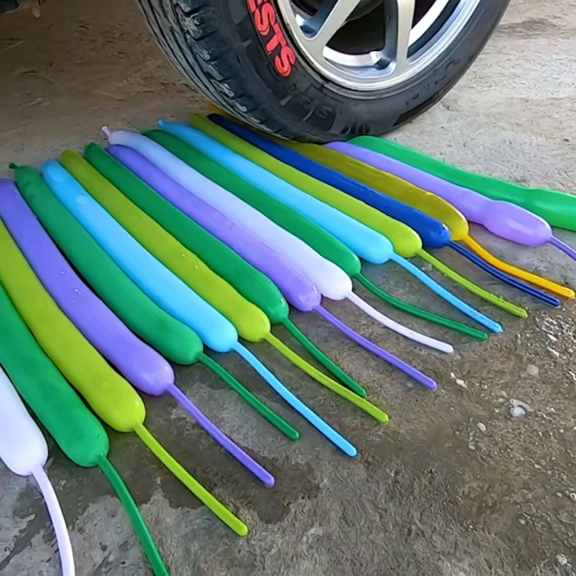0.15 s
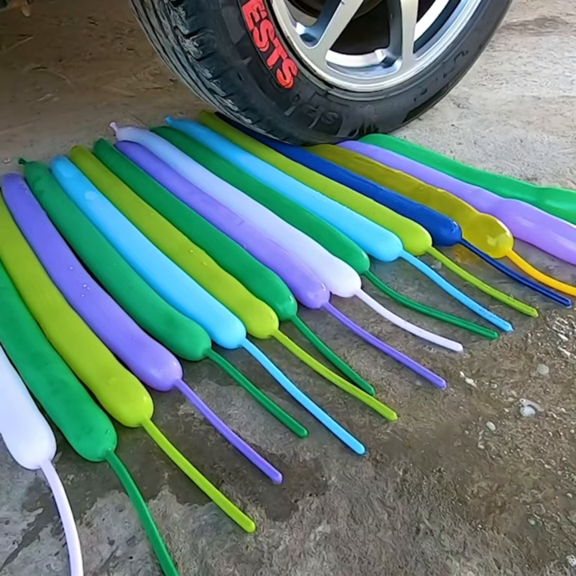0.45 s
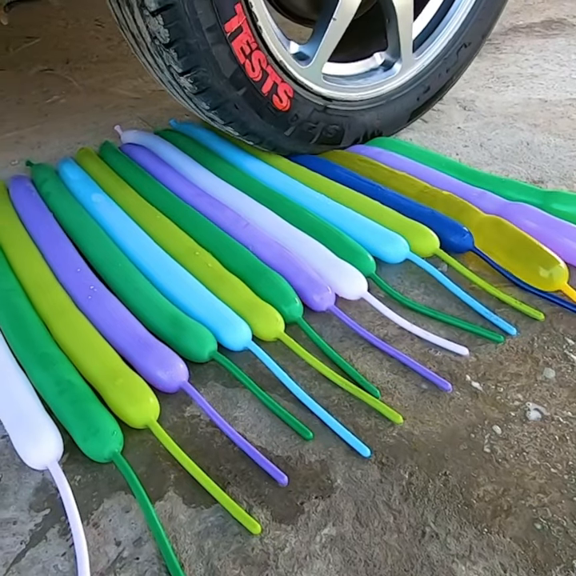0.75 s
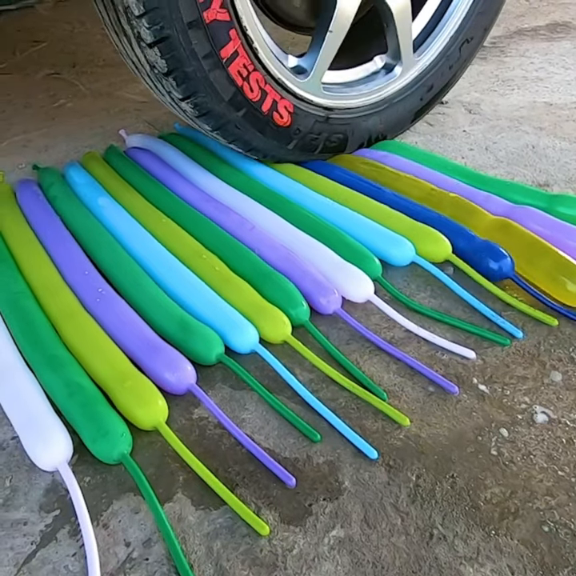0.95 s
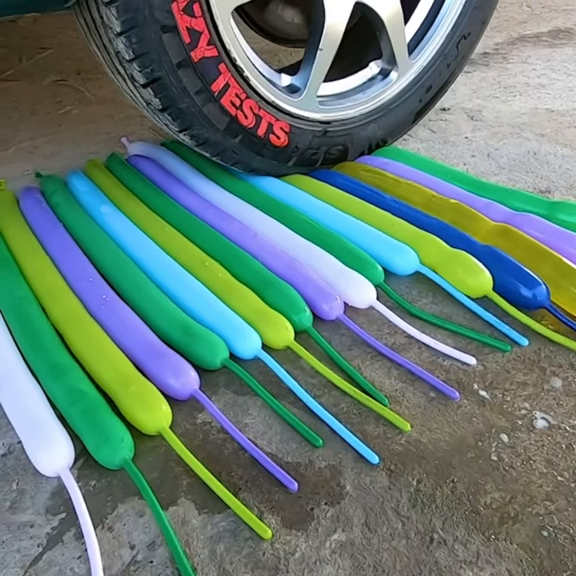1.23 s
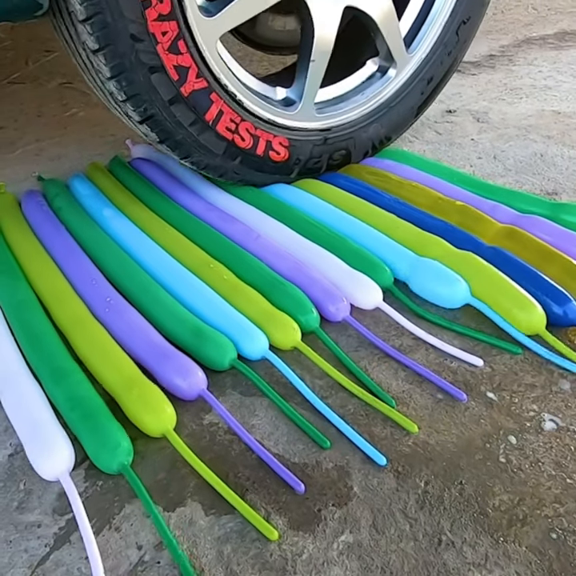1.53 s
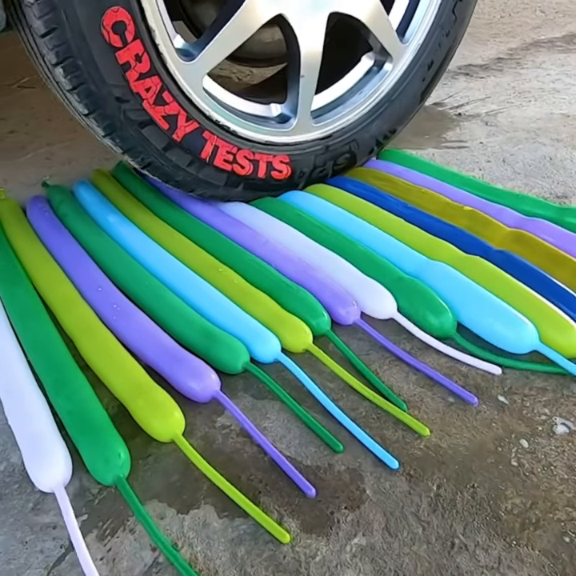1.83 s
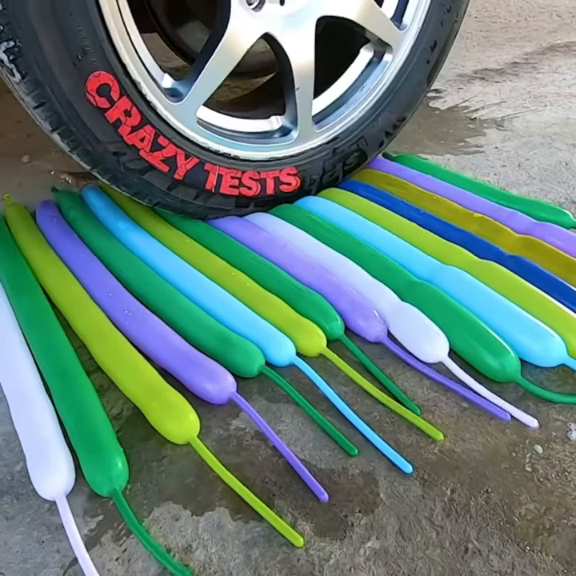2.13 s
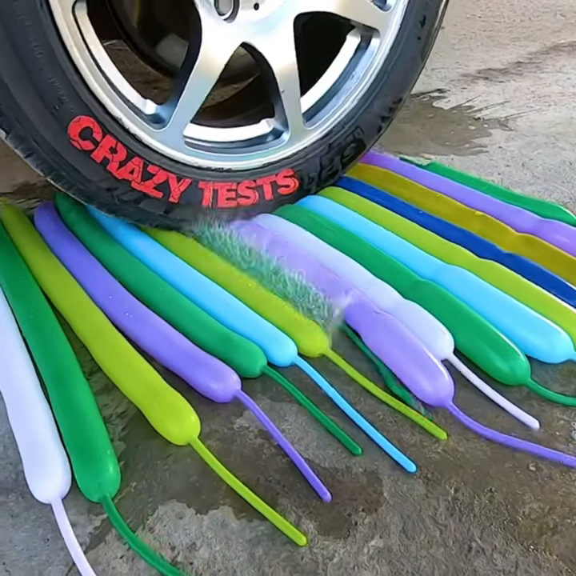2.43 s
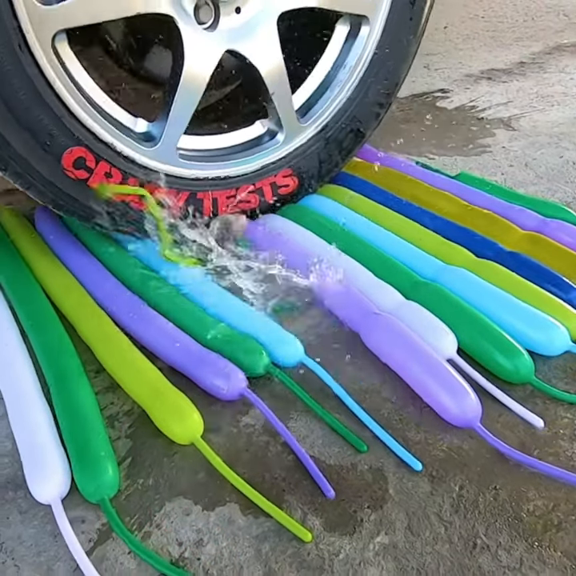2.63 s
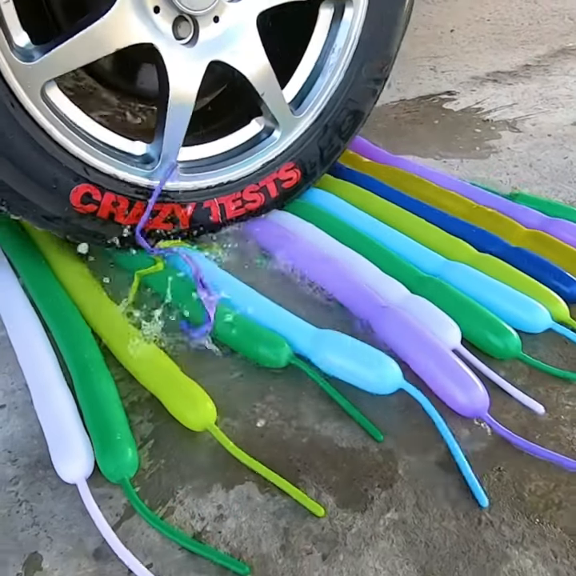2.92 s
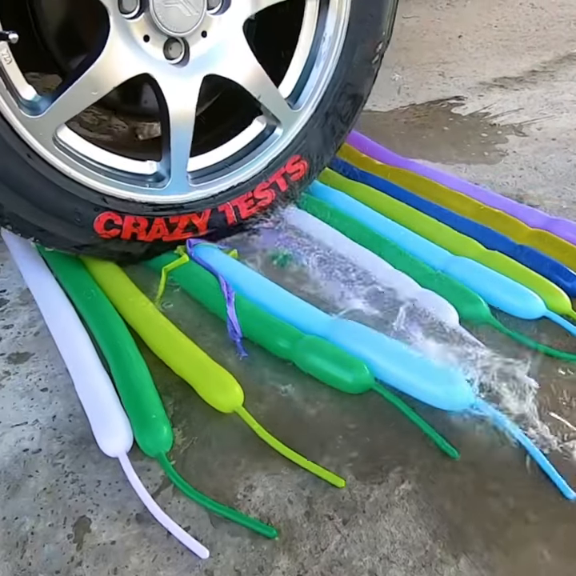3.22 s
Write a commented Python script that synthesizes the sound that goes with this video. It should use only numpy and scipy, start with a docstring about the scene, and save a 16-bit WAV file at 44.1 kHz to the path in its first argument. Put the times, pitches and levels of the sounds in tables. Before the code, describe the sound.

Water balloons bursting with sharp pops and splashes under a slow car tyre, engine rumbling.

```python
"""An engine throbs just above idle while a far bird chirps: a car is creeping over a row of long
water balloons on wet concrete. The first balloons tear under the tread with a squeak and a hissing
leak. Four more burst in the open: a crack of rubber, a sheet of spray, slaps of water with ringing
bubbles, then falling drops. The yard adds a short echo, and puffs of air rock the microphone."""
import sys
import numpy as np
from scipy import signal
from scipy.fft import rfft, irfft, next_fast_len
from scipy.io import wavfile
from scipy.ndimage import uniform_filter1d

SR = 44100
rng = np.random.default_rng(int(sys.argv[2]) if len(sys.argv) > 2 else 0)


def wav_record(signal):
    """Record a signal, one row per channel, as 16-bit PCM in the file named by sys.argv[1]."""
    frames = np.transpose(np.atleast_2d(signal))
    bounded = np.clip(frames, -1, 1)
    # unit amplitude maps onto the largest positive 16-bit level
    quanta = np.round(bounded * 32767).astype(np.int16)
    wavfile.write(sys.argv[1], SR, quanta)


N = 148617

# Tone of thrown spray, squirting water and the finest fizz. Each row: frequency in Hz, level in dB.
SPRAY_TONE = [(200, 0.5), (600, -1), (1400, -2), (3200, -2), (4600, -3), (6500, -10), (9500, -10),
              (12000, -20.5), (16000, -27)]
JET_TONE = [(200, 2.5), (700, -11.5), (1100, 1), (2200, -1.5), (3400, -0.5), (4600, -3), (5300, -9),
            (7000, -11), (11500, -19.5), (16000, -30)]
FIZZ_TONE = [(200, -53), (5000, -23), (7000, -6), (8300, 13), (10000, 1.5), (12000, -12.5), (13000, 2),
             (16000, -12)]


def undb(db):
    return 10 ** (np.asarray(db) / 20)


def unit(x):
    """Scale to rms 1."""
    return x / np.sqrt(np.mean(x ** 2) + 1e-20)


def colour(x, points):
    """Equalise along a curve of (Hz, dB) points."""
    hz, db = np.array(points, float).T
    size = next_fast_len(len(x))
    bins_hz = np.fft.rfftfreq(size, 1 / SR)
    gain = undb(np.interp(np.log(bins_hz + 1), np.log(hz), db))
    return irfft(rfft(x, size) * gain, size)[:len(x)]


def edge(x, hz, kind, order=2):
    """Low-pass or high-pass."""
    return signal.sosfilt(signal.butter(order, min(hz, SR / 2 - 100), kind, fs=SR, output="sos"), x)


def ring(x, hz, width):
    """A resonance applied twice; width is a share of its pitch."""
    b, a = signal.iirpeak(hz, 1 / width, fs=SR)
    return signal.lfilter(b, a, signal.lfilter(b, a, x))


def steady(x, size=260):
    """Even out the power of a noise over a window of size samples."""
    return x / np.sqrt(uniform_filter1d(x ** 2, size) + 1e-12)


def grains(size=32768, spread_db=4):
    """Noise whose level jumps every 32 samples: a spatter of water."""
    return rng.standard_normal(size) * undb(spread_db * np.repeat(rng.standard_normal(size // 32), 32))


def shape(x, rise, hold, t60):
    """Attack, hold and exponential release, all in seconds."""
    t = np.arange(len(x)) / SR
    return x * np.minimum(t / rise, 1) * np.exp(-np.log(1000) * np.maximum(t - rise - hold, 0) / t60)


def add(out, at, x):
    """Mix a sound in at a time in seconds."""
    i = int(at * SR)
    out[i:i + len(x)] += x[:max(N - i, 0)]


def air():
    """A faint high hiss fades at the start; puffs of air rock the microphone."""
    # Tone of the hiss. Each row: frequency in Hz, level in dB.
    hiss_tone = [(200, -14), (3000, -6), (8000, 4), (11000, -3), (13000, 8), (16000, -4)]
    # Sub-bass puffs. Each row: start in seconds, length in seconds, level in dB.
    puffs = [(2.675, 0.16, -29.5), (2.859, 0.13, -17), (3.283, 0.086, -19)]
    hiss = unit(colour(rng.standard_normal(N), hiss_tone))
    out = undb(-65.5) * shape(hiss, rise=0.0092, hold=0.032, t60=1.2)
    for at, length, db in puffs:
        swell = np.hanning(int(length * SR))
        buffet = edge(rng.standard_normal(N), 12.5, "low", order=3)[-len(swell):]
        add(out, at, undb(db) * swell * unit(buffet))
    return out


def bird():
    """A far bird: faint fluttering chirps that arch up in pitch and back."""
    # Each row: start in seconds, length in seconds, top pitch in Hz, level in dB.
    chirps = [(.71, .04, 4000, -65), (.745, .04, 3300, -65), (1.02, .04, 4500, -69),
              (1.065, .045, 4900, -67), (1.14, .04, 4400, -68), (1.44, .04, 4000, -71),
              (1.47, .03, 3700, -65)]
    out = np.zeros(N)
    for at, length, hz, db in chirps:
        arch = np.sin(np.linspace(0, np.pi, int(length * SR)))
        pitch = hz * (1 - .15 * (1 - arch))
        flutter = unit(edge(rng.standard_normal(N), 130, "low"))[:len(arch)]
        add(out, at, undb(db) * arch * flutter * np.sin(2 * np.pi * np.cumsum(pitch) / SR))
    return out


def engine():
    """A deep exhaust throb, wavering overtones, a faint whine and noise that swells with each firing."""
    # Engine speed. Each row: time in seconds, firings per second.
    firing_rate = [(0, 28), (.3, 27), (.7, 27.4), (1.1, 27.6), (1.5, 28.8), (1.9, 27.8), (2.15, 27.9),
                   (2.55, 23.6), (2.9, 26.6), (3.37, 25.9)]
    # Fader moves. Each row: time in seconds, throb level in dB, gain of the overtones in dB.
    faders = [(0, -28.5, -47), (.7, -26, -47), (1.6, -25, -46.5), (2.2, -25, -47.5), (2.45, -26, -51.5),
              (3.0, -27, -55), (3.37, -25.5, -52.5)]
    # Each row: multiple of the firing rate, relative level in dB.
    overtones = [(2, -9.5), (2.33, -31), (3, -10.5), (4, -18.5), (5, -3), (6, -4), (7, -17.5), (8, -22.5),
                 (10, -17), (12, -20.5)]
    # Tone of the engine and yard noise. Each row: frequency in Hz, level in dB.
    rumble_tone = [(20, 0), (60, 0), (150, -1), (230, -8), (400, -13), (680, -7.5), (900, -13.5),
                   (1350, -15), (2000, -22.5), (3200, -28.5), (5000, -31), (7000, -34), (11000, -47),
                   (16000, -46)]
    # Each row: pitch in Hz, width as a share of the pitch, level in dB.
    whines = [(1401, 0.07, -69), (5160, .05, -83.5)]

    def waver():
        return unit(edge(rng.standard_normal(N), 3, "low"))

    t = np.arange(N) / SR
    phase = 2 * np.pi * np.cumsum(np.interp(t, *np.array(firing_rate).T)) / SR
    when, throb_db, hum_db = np.array(faders).T
    throb = undb(np.interp(t, when, throb_db)) * np.sin(phase)
    hum = np.zeros(N)
    for multiple, db in overtones:
        level = undb(db + 1.23 * waver())
        hum += level * np.sin(multiple * phase + 0.45 * waver() + rng.uniform(0, 2 * np.pi))
    hum *= undb(np.interp(t, when, hum_db))
    rumble = unit(colour(rng.standard_normal(N), rumble_tone)) * (1 + 0.14 * np.sin(phase))
    whine = sum(undb(db) * unit(ring(rng.standard_normal(N), hz, width)) for hz, width, db in whines)
    return whine + np.sqrt(2) * (throb + hum) + undb(-50.5) * rumble


def jets():
    """Water hisses through a slit under the tread, which gives it a whistle; fine spray fizzes on top."""
    # Each row: start in seconds, level in dB, rise, hold and t60 in seconds, whistle pitch in Hz,
    # relative fizz in dB.
    squirts = [(1.684, -39.5, 0.0067, 0.0045, 0.27, 2680, -12.5),
               (1.819, -57.5, 0.031, .015, 0.2, 3630, -38), (1.952, -49.5, 0.0025, 0.015, 0.1, 2450, -8.5),
               (1.967, -47.5, 0.0094, 0.0059, 0.33, 3100, -24), (2.018, -58, 0.042, .07, 0.38, 3730, -7.5),
               (2.107, -54.5, 0.038, 0.028, 0.35, 3860, -6.5), (2.194, -59, 0.018, 0.011, 0.31, 3930, 3.5),
               (2.655, -50, 0.0016, 0.011, 0.084, 3500, 1), (2.701, -52, 0.031, .005, 0.27, 3330, -8),
               (2.883, -59, 0.014, 0.12, 0.77, 2900, -10.5), (3.099, -51.5, 0.072, 0.025, 0.24, 2890, -5.5),
               (3.154, -61, .002, 0.0024, 0.06, 2900, -25)]
    out = np.zeros(N)
    for at, db, rise, hold, t60, hz, fizz_db in squirts:
        flow = unit(colour(grains(), JET_TONE))
        whistle = undb(0.5) * unit(ring(grains(), hz, width=0.58))
        fizz = undb(fizz_db) * unit(colour(grains(), FIZZ_TONE))
        add(out, at, undb(db) * shape(flow + whistle + fizz, rise, hold, t60))
    return out


def squeaks():
    """Pinched rubber slips and tears: a narrow resonance with a rasp."""
    # Each row: start in seconds, level in dB, pitch in Hz, t60 in seconds, relative rasp in dB.
    slips = [(1.679, -31.5, 1183, 0.042, -10), (1.6775, -34.5, 2720, .055, -2.5),
             (1.690, -29, 4440, 0.049, -2), (1.692, -39.5, 1720, 0.11, 0), (2.15, -51.5, 2035, 0.21, -14),
             (2.7322, -24.5, 4270, 0.02, -11.5), (2.949, -41, 3570, 0.026, -15)]
    out = np.zeros(N)
    for at, db, hz, t60, rasp_db in slips:
        tone = steady(ring(grains(size=8192), hz, width=0.084))
        rasp = undb(rasp_db) * unit(colour(grains(size=8192), JET_TONE))
        add(out, at, undb(db) * shape(tone + rasp, rise=0.00033, hold=0.0014, t60=t60))
    return out


def bubble(hz, cycles, glide=0.078):
    """A pocket of air rings down by 40 dB over some cycles, rising a little in pitch."""
    age = np.arange(int(cycles / hz * SR)) * hz / SR / cycles  # 0 to 1
    return np.sin(2 * np.pi * cycles * age * (1 + glide * age / 2)) * np.exp(-np.log(100) * age)


def bubbles(count=200, per_s=420, low_hz=995, high_hz=5070):
    """Small bubbles of many sizes, one after another."""
    out = np.zeros(N)
    for k, (jitter, pitch, strength) in enumerate(rng.random((count, 3))):
        hz = low_hz * (high_hz / low_hz) ** pitch
        add(out, (k + jitter) / per_s, 2 * strength ** 2 * bubble(hz, cycles=20.4))
    return out[:SR]


def drops(per_s=250, spread_db=27, size=32768):
    """Falling drops land as scattered ticks of uneven strength."""
    # Tone of a drop. Each row: frequency in Hz, level in dB.
    drop_tone = [(300, 7), (1200, -19), (3500, 9.5), (6500, -13), (10000, -2), (12500, -12), (16000, -25)]
    hits = (rng.random(size) < per_s / SR) * undb(-spread_db * rng.random(size))
    return unit(colour(hits, drop_tone))


def slaps():
    """Slugs of water strike tyre and ground: a knock, then trapped air rings briefly under a splash."""
    # Each row: start in seconds, level in dB, cavity pitch in Hz, t60 in seconds, relative splash in dB.
    impacts = [(2.413, -36, 259, 0.32, -10), (2.434, -24, 1690, .045, 0.5), (2.431, -36.5, 466, 0.14, -19),
               (2.469, -33, 1490, 0.047, -16), (2.468, -41, 446, 0.2, -10), (2.4874, -28, 990, .025, -20),
               (2.5261, -22.5, 1200, 0.028, -3), (2.5335, -26, 1420, 0.068, 4.5),
               (2.529, -37, 397, 0.19, 2), (2.5555, -22.5, 1480, 0.044, -1.5),
               (2.562, -34, 1020, 0.11, 5.5), (2.580, -36.5, 3920, 0.048, -2),
               (2.799, -38.5, 1825, 0.11, 8.5), (2.837, -33.5, 1300, 0.077, -27),
               (2.840, -42.5, 580, 0.11, -18), (3.203, -26.5, 1520, 0.15, -24),
               (3.214, -18, 1133, 0.08, -8), (3.216, -22, 2333, 0.024, -2),
               (3.2305, -27.5, 760, 0.031, -14), (3.231, -23, 2510, 0.052, -2.5),
               (3.251, -29, 2340, 0.039, -4), (3.272, -41.5, 1030, 0.078, 1.5),
               (3.318, -47, 2560, 0.032, -21)]
    out = np.zeros(N)
    for at, db, hz, t60, splash_db in impacts:
        cavity = steady(ring(grains(size=8192), hz, width=0.37))
        splash = unit(edge(colour(grains(size=8192), SPRAY_TONE), 4550, "low", order=1))
        slap = shape(cavity + undb(splash_db) * splash, rise=0.00056, hold=0.0025, t60=t60)
        knock = undb(5) * bubble(hz, cycles=14.4)
        add(slap, 0, knock)
        add(out, at, undb(db) * edge(slap, hz * 0.53, "high", order=4))
    return out


def crack(fizz_db, size=2048):
    """A rip runs through the rubber in about a millisecond and flings off the finest spray."""
    # Tone of ripping rubber. Each row: frequency in Hz, level in dB.
    rip_tone = [(200, -1), (1000, -4.5), (2000, 3), (3600, 10.5), (5500, 2.5), (7000, -32), (12000, -4),
                (16000, -19)]
    rip = steady(colour(rng.standard_normal(size), rip_tone), size=30)
    fizz = steady(colour(rng.standard_normal(size), FIZZ_TONE), size=30)
    return shape(rip + undb(fizz_db) * fizz, rise=0.00082, hold=0.00051, t60=0.0052)


def bursts():
    """Each balloon cracks and throws spray; bubbles ring, mist and drops settle, and shreds whip back."""
    # Each row: start in seconds, crack and spray levels in dB, the spray's low cut in Hz and t60 in
    # seconds, mist and drop levels in dB, the crack's relative fizz in dB.
    balloons = [(2.406, -10, -18, 215, .14, -66, -52, -0.5),
                (2.5265, -17.5, -22.5, 284, 0.14, -42, -69, -20),
                (2.7713, -13.5, -28, 2580, 0.21, -59, -62, -8),
                (3.1916, -17, -20.5, 1490, 0.14, -46, -50, 3.5)]
    # Tone of the mist. Each row: frequency in Hz, level in dB.
    mist_tone = [(300, 7.5), (1200, -14), (4000, -4), (6500, -1.5), (10000, -6), (16000, -12)]
    # Snaps of rubber shreds. Each row: start in seconds, level in dB, relative fizz in dB.
    shreds = [(1.9575, -49, -4), (2.41, -47, -14), (2.4302, -25.5, 1), (2.556, -25, -6), (2.61, -46, 5),
              (2.62, -50, 8), (2.655, -51, -5), (2.661, -41, -5), (2.7297, -52, -9), (2.744, -47, -13),
              (2.7943, -28.5, 5.5), (2.8003, -25, -14), (2.808, -24, -10), (2.871, -50.5, 11),
              (3.2033, -28, -3), (3.231, -36, 7.5), (3.291, -40, -18), (3.318, -51, 1)]
    out = np.zeros(N)
    for at, crack_db, spray_db, low_hz, t60, mist_db, drops_db, fizz_db in balloons:
        add(out, at, undb(crack_db) * edge(crack(fizz_db), low_hz * 1.3, "high"))
        spray = unit(edge(colour(grains(), SPRAY_TONE), low_hz, "high", order=3))
        add(out, at, undb(spray_db) * shape(spray, rise=0.00098, hold=0.0026, t60=t60))
        mist = unit(colour(grains(), mist_tone))
        add(out, at, undb(mist_db) * shape(mist, rise=0.011, hold=0.018, t60=0.47))
        add(out, at, undb(drops_db) * shape(drops(), rise=0.011, hold=0.019, t60=1))
        add(out, at, undb(-42.5) * shape(bubbles(), rise=0.012, hold=0.025, t60=0.84))
    for at, db, fizz_db in shreds:
        add(out, at, undb(db) * crack(fizz_db))
    return out


def scene():
    """Balloons and bird get a short, dull yard echo; engine and air stay dry. Mono."""
    events = bursts() + slaps() + squeaks() + jets() + bird()
    echo = shape(edge(grains(), 3300, "low", order=1), rise=0.0013, hold=0.0026, t60=0.19)
    yard = signal.fftconvolve(events, echo / np.sqrt(np.sum(echo ** 2)))[:N]
    return (events + undb(-19.5) * yard + engine() + air())[None]


def record(dry):
    """A quick fade-in follows a brief silence; the treble is coloured, peaks clipped and the top cut."""
    # Microphone colour. Each row: frequency in Hz, gain in dB.
    mic_tone = [(20, 0), (4800, 0), (6600, -3), (8500, -1), (11500, 4), (13000, -8), (16000, -7)]
    silence_s, fade_s, ceiling, top_hz = 0.031, 0.0019, .85, 16000
    fade_in = np.clip((np.arange(N) / SR - silence_s) / fade_s, 0, 1)
    clipped = np.clip(colour(dry[0], mic_tone), -ceiling, ceiling)
    high_cut = signal.ellip(8, .2, 70, top_hz, fs=SR, output="sos")
    return signal.sosfilt(high_cut, clipped * fade_in)[None]


dry = scene()
out = record(dry)
wav_record(out)
```